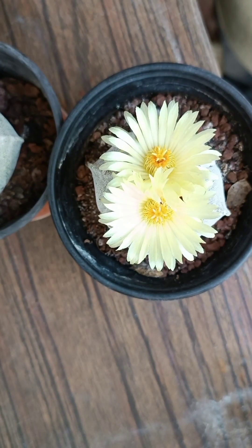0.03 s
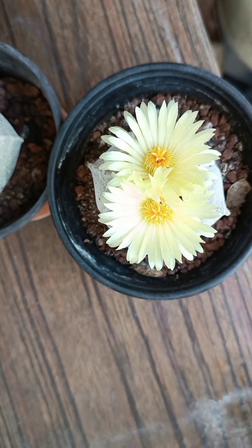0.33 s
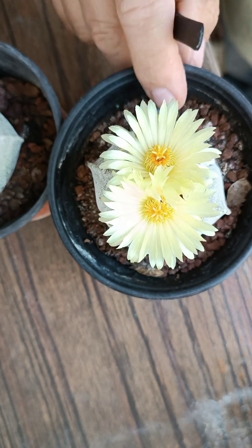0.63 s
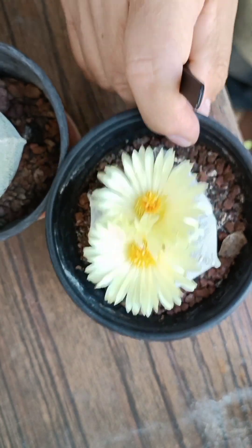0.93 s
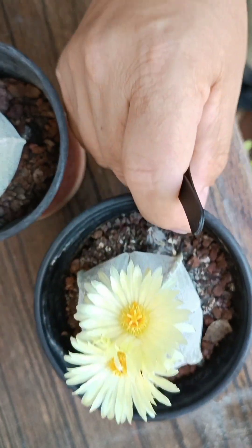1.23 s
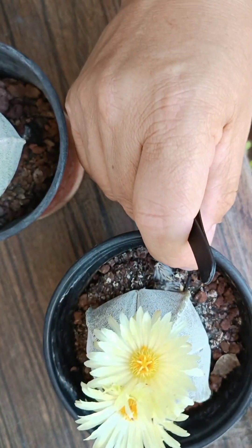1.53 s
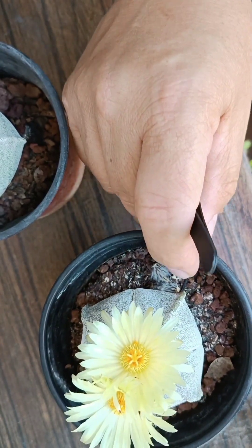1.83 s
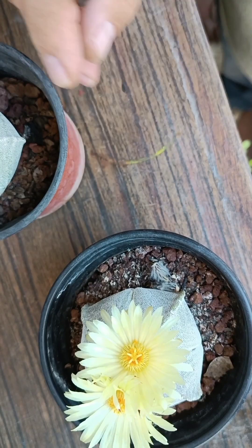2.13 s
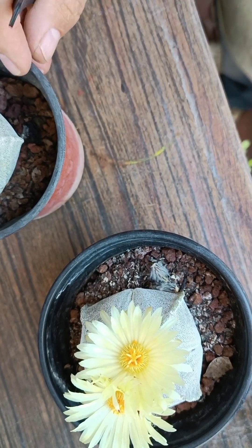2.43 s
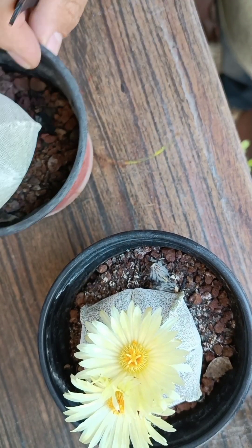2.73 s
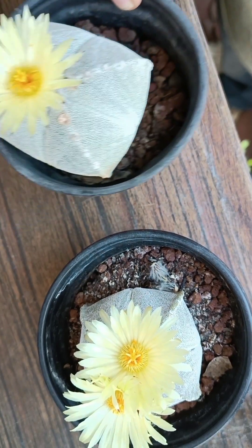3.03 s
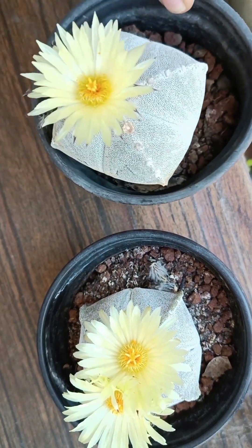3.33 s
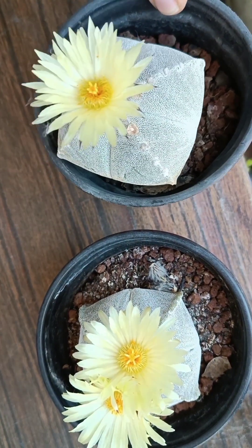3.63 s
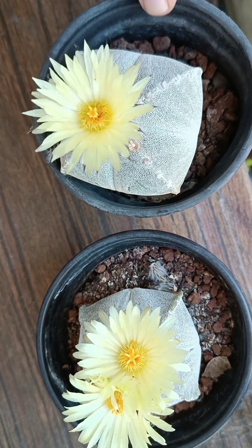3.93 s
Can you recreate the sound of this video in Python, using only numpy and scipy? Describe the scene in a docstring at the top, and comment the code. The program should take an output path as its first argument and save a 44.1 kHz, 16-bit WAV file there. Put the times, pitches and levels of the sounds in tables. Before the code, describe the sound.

Two gravel-filled plastic pots are dragged one after the other over a wooden table, close by. The first scrapes and bumps, the second judders with a grittier rasp. Outdoors, a distant engine drones and birds chirp faintly.

```python
"""Plant pots dragged over a table

Two gravel-filled plastic pots are dragged in turn over a wooden table outdoors. Their bases stick
and slip: the table booms, the thin walls rasp, grit crackles and the pots tick as they catch.
Fingers rub and tap the rims. Behind it a distant engine drones and a few birds chirp faintly."""
import sys
import numpy as np
from scipy import signal
from scipy.fft import rfft, irfft
from scipy.io import wavfile
from scipy.ndimage import uniform_filter1d

SR = 44100
rng = np.random.default_rng(int(sys.argv[2]) if len(sys.argv) > 2 else 0)


def generate_wav(signal):
    """Clip the signal to [-1, 1] and save it as 16-bit WAV at the path in sys.argv[1]."""
    frames = np.transpose(np.atleast_2d(signal))
    scaled = np.clip(frames, -1, 1) * 32767
    pcm = np.round(scaled).astype(np.int16)
    wavfile.write(sys.argv[1], SR, pcm)


N = 176400
TIME = np.arange(N) / SR
CRUNCH_T60_S = 0.014

# spectra of crackling grit and of a knocked pot wall (frequency [Hz], density [dB])
GRIT_SPECTRUM = [(1500, -24), (3000, -3.5), (5000, 0), (7000, -1), (9000, -8.5), (11500, 0), (13000, -4),
                 (15000, 3.5), (17000, -4.5)]
KNOCK_SPECTRUM = [(350, -23), (550, 10), (950, 3.5), (1600, -0.5), (2700, 2), (3500, -9.5), (5000, -15.5),
                  (8000, -28.5), (16000, -54)]
# modes of the table under each pot (frequency [Hz], width [Hz], level [dB])
FIRST_TABLE_MODES = [(225.3, 24, 4), (288, 18, 4.5), (332, 110, -7), (406, 30, -2), (417, 32, 0),
                     (490, 45, -6.5), (570, 33, -7)]
SECOND_TABLE_MODES = [(217.5, 12, 2.5), (245, 34, 3), (389.3, 7.2, -3.5), (423.7, 11, -1.5),
                      (478.5, 14, -10), (563, 36, -9.5)]
# modes of each pot's wall (frequency [Hz], width [Hz], level [dB])
FIRST_POT_MODES = [(706, 43, -3), (915, 160, 5.5), (1059, 45, 6.5), (1297, 70, 1), (1510, 25, -4.5),
                   (1805, 78, 0), (2260, 90, -3.5), (2590, 130, -2), (2990, 80, -7)]
SECOND_POT_MODES = [(745, 79, 3.5), (820, 16, 1), (868, 8.7, 0.5), (954, 14, 5), (1118, 63, 3),
                    (1195, 45, -2), (1374, 35, 3), (1830, 27, -1), (2040, 22, 3), (2400, 73, 4.5),
                    (3890, 320, -6)]


def from_db(db):
    return 10 ** (np.asarray(db) / 20)


def unit_rms(x):
    return x / np.sqrt(np.mean(x ** 2) + 1e-20)


def curve(rows, column=1, outside=None):
    rows = np.array(rows)
    return np.interp(TIME, rows[:, 0], rows[:, column], outside, outside)


def at_hz(rows, hz):
    rows = np.array(rows)
    return np.interp(np.log(hz + 1), np.log(rows[:, 0]), rows[:, 1])


def pan(left_over_right_db):
    return unit_rms(from_db([[left_over_right_db / 2], [-left_over_right_db / 2]]))


def add(out, start_s, sound):
    start = max(int(start_s * SR), 0)
    out[:, start:start + sound.shape[1]] += sound[:, :N - start]


def convolve(x, response):
    return signal.fftconvolve(np.atleast_2d(x), response, axes=1)[:, :N]


def steady(x, window=1300):
    """Level held at rms 1 over `window` samples; finer grain stays."""
    return x / np.sqrt(np.abs(uniform_filter1d(np.mean(x ** 2, axis=0), window)) + 1e-9)


def drift(cutoff_hz):
    """Low-passed random wander, rms 1."""
    lowpass = signal.butter(2, cutoff_hz, fs=SR, output="sos")
    return unit_rms(signal.sosfilt(lowpass, rng.standard_normal(N + SR))[SR:])


def noise(spectrum, size=N):
    """Coloured stereo noise, narrow in the bass, wide in the treble; rms 1."""
    # stereo likeness (frequency [Hz], left-right correlation [-])
    correlation = [(60, 1), (150, 0.83), (260, 0.93), (500, 0.35), (1000, 0.097), (2500, 0.17),
                   (15000, -0.027)]
    hz = np.arange(size // 2 + 1) * SR / size
    mid, side = rfft(rng.standard_normal((2, size)))
    alike = np.clip(at_hz(correlation, hz), -1, 1)
    stereo = np.sqrt(1 + alike) * mid + np.sqrt(1 - alike) * side * [[1], [-1]]
    gain = from_db(at_hz(spectrum, hz)) * np.minimum(hz / spectrum[0][0], 1) ** 2
    return unit_rms(irfft(gain * stereo, size))


def contacts(per_s, spread_db):
    """Random clicks of uneven size."""
    hits = rng.random(N) < per_s / SR
    strength = from_db(spread_db * np.minimum(rng.exponential(1, N), 4))
    return hits * strength * rng.choice([-1, 1], N)


def resonate(x, hz, width_hz):
    """One resonance, rms 1."""
    radius = np.exp(-np.pi * width_hz / SR)
    feedback = [1, -2 * radius * np.cos(2 * np.pi * hz / SR), radius * radius]
    return unit_rms(signal.lfilter([1, 0, -1], feedback, x + 1e-18))


def burst(spectrum, t60_s, size=16384):
    """Decay of many close modes after one contact, energy 1."""
    decay = from_db(-60 * np.arange(size) / SR / t60_s)
    return unit_rms(noise(spectrum, size) * decay) / np.sqrt(size)


def scattered(clicks, spectrum, t60_s, spots):
    """Clicks land on random spots, each with a slightly different ring."""
    spot = rng.integers(0, spots, N)
    return sum(convolve(clicks * (spot == k), burst(spectrum, t60_s, size=4096)) for k in range(spots))


def ringing(clicks, modes):
    """Clicks drive each mode with random strength; a second filter darkens the gaps between modes."""
    return sum(from_db(db) * resonate(resonate(clicks * rng.standard_normal((2, N)), hz, width_hz),
                                      hz, 8 * width_hz) for hz, width_hz, db in modes)


def struck(modes, weights):
    """Damped modes after one blow."""
    age_s = np.arange(16384) / SR
    return sum(weight * from_db(db) * np.exp(-np.pi * width_hz * age_s) * np.sin(2 * np.pi * hz * age_s)
               for weight, (hz, width_hz, db) in zip(weights, modes))


def echo(x, t60_s):
    """Scatter from nearby walls and objects."""
    spectrum = [(200, -7.5), (3000, 9.0), (7000, 1.5), (16000, -14.5)]  # (frequency [Hz], density [dB])
    rise_s = 0.00067
    swell = 1 - np.exp(-np.arange(16384) / SR / rise_s)
    return convolve(x, swell * burst(spectrum, t60_s))


def air():
    """Steady outdoor hush."""
    # background spectrum (frequency [Hz], density [dB])
    spectrum = [(300, 1.5), (600, -1.5), (1000, -6), (1500, -9.5), (2500, -10.5), (3400, -20),
                (5000, -27.5), (7000, -34.5), (10000, -41.5), (14500, -36.5), (17000, -32.5)]
    return from_db(-50.5) * noise(spectrum)


def birds():
    """Short, distant glides blurred by echoes."""
    # calls (time [s], length [s], start [Hz], end [Hz], level [dB])
    chirps = [(.05, .055, 3700, 4350, -61), (.11, .045, 3400, 3250, -65), (.308, .035, 4450, 4050, -62),
              (.8, .06, 3560, 3500, -58), (2.0, .05, 4100, 3700, -61), (2.06, .045, 3500, 3350, -61),
              (3.94, .07, 1780, 1740, -59)]
    out = np.zeros(N)
    wobble = 1 + 0.022 * drift(120)
    for start_s, length_s, start_hz, end_hz, db in chirps:
        progress = np.clip((TIME - start_s) / length_s, 0, 1)
        hz = (start_hz + (end_hz - start_hz) * progress) * wobble
        out += from_db(db) * np.sin(np.pi * progress) * np.sin(2 * np.pi * np.cumsum(hz) / SR)
    return out + from_db(-3) * echo(out, t60_s=0.4)


def engine():
    """Distant engine: fluttering drone, weak octave, low throb, rumble that swells with the drone."""
    # drone and throb envelopes (time [s], level [dB])
    drone_level = [(0, -24), (.1, -21), (.16, -23), (.185, -31), (.22, -23.5), (.27, -24), (.29, -31),
                   (.32, -23), (.42, -26), (.47, -37), (.5, -31), (.56, -39), (.69, -39), (.74, -55),
                   (.88, -39), (.97, -23), (1.04, -32), (1.12, -25), (1.19, -26), (1.22, -38), (1.26, -27),
                   (1.32, -40), (1.41, -42), (1.45, -32), (1.51, -46), (1.6, -25), (1.64, -39), (1.68, -27),
                   (1.82, -30), (1.96, -26), (1.99, -41), (2.03, -29), (2.38, -26.5), (2.5, -26),
                   (2.62, -35), (2.69, -30), (2.74, -39), (2.81, -32), (2.86, -42), (2.94, -32),
                   (3.05, -38), (3.3, -44), (4, -48)]
    throb_level = [(0, -55), (.6, -52), (.8, -43), (1.05, -50), (1.4, -45), (1.8, -47), (2.12, -40),
                   (2.5, -47), (2.85, -44), (3.3, -53), (4, -56)]
    # drone pitch (time [s], frequency [Hz])
    drone_pitch = [(0, 156.5), (.3, 159), (.95, 154), (1.15, 157), (1.7, 154), (2.15, 150), (2.45, 155.2),
                   (2.75, 150.3), (3.1, 158.5), (4, 153.8)]
    # rumble spectrum (frequency [Hz], density [dB])
    rumble_spectrum = [(25, -18), (50, -15), (85, -3.5), (112, 8), (140, 5), (185, 5), (220, -1.5),
                       (280, -6), (400, -15), (700, -52.5)]
    throb_hz, flutter_depth = 68.7, 0.44
    drone_db = curve(drone_level)
    phase = 2 * np.pi * np.cumsum(curve(drone_pitch)) / SR
    flutter = 1 + flutter_depth * resonate(rng.standard_normal(N), hz=16.4, width_hz=5.1)
    blur = 0.66 * drift(7.7) * np.cos(phase)
    drone = unit_rms(uniform_filter1d(flutter, size=400) * np.sin(phase) + blur)
    octave = from_db(-27) * unit_rms(drift(27) * np.sin(2 * phase))
    throb_phase = 2 * np.pi * throb_hz * TIME
    throb_blur = 0.59 * (drift(8.8) * np.sin(throb_phase) + drift(11.0) * np.cos(throb_phase))
    throb = unit_rms(np.sin(throb_phase) + throb_blur)
    rumble = from_db(-38 + 0.25 * (drone_db - drone_db.mean())) * noise(rumble_spectrum)
    return from_db(drone_db) * (drone + octave) + from_db(curve(throb_level)) * throb + rumble


def squeak():
    """One short, high squeak that drops onto its pitch."""
    start_s, length_s, final_hz = 0.41, 0.022, 5750
    progress = np.clip((TIME - start_s) / length_s, 0, 1)
    phase = 2 * np.pi * np.cumsum(final_hz * (1 + 0.09 * (1 - progress) ** 4)) / SR
    return from_db(-49.5) * pan(-13) * np.sin(np.pi * progress) * np.sin(phase)


def finger_rubs():
    """Skin sticks and slips on plastic; a firmer rub rings the rim more."""
    # rubs (time [s], length [s], level [dB], left-right [dB], pot [0 or 1])
    rubs = [(0.235, 0.059, -66, -8, 0), (0.392, 0.046, -57, -16, 0), (0.615, 0.14, -54, -1.5, 0),
            (0.752, 0.15, -54, -2.5, 0), (1.873, 0.073, -59, -1, 1), (2.299, 0.088, -52.5, -2, 1),
            (2.464, 0.063, -45, -3, 1), (2.522, 0.12, -49.5, -4.5, 1), (2.67, 0.18, -61.5, -2, 1),
            (3.686, 0.1, -63, -2, 1), (3.819, 0.2, -60, -2, 1)]
    # skin friction spectrum (frequency [Hz], density [dB])
    hiss_spectrum = [(1000, -5.5), (2400, 2.5), (3900, -11), (4700, -5.5), (5500, -17.5), (7000, -5),
                     (9000, -16), (12000, -12), (16000, -22)]
    # modes of each rim (frequency [Hz], width [Hz], level [dB])
    first_rim_modes = [(3580, 300, -6), (4200, 420, -4.5), (4930, 330, -5), (6050, 450, -8.5),
                       (7450, 400, -10.5), (13200, 600, -15), (14500, 600, -14)]
    second_rim_modes = [(1820, 220, -0.5), (2370, 160, -6.5), (3340, 86, -4), (3670, 120, -9),
                        (4090, 190, -5), (5310, 110, -1.5), (5940, 340, -4), (7340, 300, -12.5),
                        (8900, 160, -16.5), (10440, 400, -16.5), (12400, 300, -16.5)]
    fade_s, firm_db = 0.025, -50
    slips = contacts(per_s=600, spread_db=2.5)
    hiss = noise(hiss_spectrum)
    roughness = from_db(drift(90))
    rims = [ringing(slips, modes) for modes in (first_rim_modes, second_rim_modes)]
    out = np.zeros((2, N))
    for start_s, length_s, db, pan_db, pot in rubs:
        ring = from_db(0.4 * (db - firm_db)) * rims[pot]
        envelope = np.clip(np.minimum(TIME - start_s, start_s + length_s - TIME) / fade_s, 0, 1)
        out += from_db(db) * pan(pan_db) * envelope * unit_rms(roughness * (hiss + ring))
    return out


def finger_taps():
    """Light, bright clicks as fingers take hold of the second rim."""
    # taps (time [s], energy [dB], left-right [dB])
    taps = [(2.6523, -23, -6), (2.671, -21, -4), (2.682, -21, -6)]
    # tapped rim spectrum (frequency [Hz], density [dB])
    spectrum = [(2000, -6), (3900, -4), (4700, -4), (5600, 2), (7000, -1), (8500, -24), (12000, -18),
                (16000, -22)]
    out = np.zeros((2, N))
    for start_s, db, pan_db in taps:
        add(out, start_s, from_db(db) * pan(pan_db) * burst(spectrum, t60_s=0.013))
    return out


def pot_ticks():
    """A pot catches, rocks or creaks: sharp snap, bright crack, longer ring of the wall."""
    # catches (time [s], gain [dB], extra ring gain [dB], left-right of snap and crack [dB])
    catches = [(0.897, -39.5, 5, 0), (0.9235, -35.5, 6, 8), (1.0065, -46.5, 5, -4),
               (1.0677, -36.5, 1.5, 11), (1.1478, -46, -4, 14), (1.2378, -50, 7, 7),
               (1.3051, -34.5, 1.5, 10), (1.357, -45, -16, 9), (1.407, -47, -13, 4), (1.5124, -41, 3.5, -2),
               (1.6239, -51, 5.5, 8), (1.7944, -40, -28, 4), (1.813, -45, -7, 4), (1.8612, -53, -7, 1.5),
               (1.997, -51.5, -22, -3.5), (2.6813, -45, -30, 7), (2.742, -39.5, -15, -4),
               (2.8052, -40, 0.5, 1.0), (2.8747, -35, -2.5, -4), (2.9636, -32, -2, -17),
               (3.1884, -46, -20, -3), (3.234, -46, 7, -4), (3.2745, -31, -11, -1), (3.321, -27, -2, -4),
               (3.6143, -42, 4, -4), (3.6408, -45, -23, -4), (3.8253, -44, -30, 0)]
    out = np.zeros((2, N))
    for start_s, db, ring_db, pan_db in catches:
        snap = from_db(16) * burst(GRIT_SPECTRUM, t60_s=0.006)
        crack = from_db(13) * burst(GRIT_SPECTRUM, t60_s=0.045)
        ring = from_db(ring_db + 22) * burst(KNOCK_SPECTRUM, t60_s=0.11)
        add(out, start_s, from_db(db) * (pan(pan_db) * (snap + crack) + ring))
    return out


def pot_bumps():
    """A base drops back on the table and rings both table and pot."""
    # drops (time [s], gain [dB], extra clack gain [dB], pot [0 or 1])
    drops = [(1.1028, -17.5, 11.5, 0), (1.1215, -24, 7, 0), (1.1685, -33, 13, 0), (3.0988, -28, 18, 1)]
    bodies = [(FIRST_TABLE_MODES, FIRST_POT_MODES), (SECOND_TABLE_MODES, SECOND_POT_MODES)]
    out = np.zeros((2, N))
    for start_s, db, clack_db, pot in drops:
        table_modes, pot_modes = bodies[pot]
        table = from_db(-14) * struck(table_modes, np.ones(len(table_modes)))
        wall = from_db(-18) * struck(pot_modes, rng.standard_normal((len(pot_modes), 2, 1)))
        clack = from_db(clack_db) * burst(KNOCK_SPECTRUM, t60_s=0.06)
        add(out, start_s, from_db(db) * (table + wall + clack))
    return out


def pot_judder():
    """Near-periodic stick-slip of the second base: a hollow groan whose overtones ring the wall."""
    # judder (time [s], slip rate [1/s], level [dB])
    judder = [(3.03, 212, -53), (3.065, 221, -24), (3.11, 218, -30.5), (3.143, 218.6, -30),
              (3.18, 207, -36), (3.21, 270, -67)]
    cycles = np.cumsum(curve(judder) * (1 + 0.012 * drift(74))) / SR
    slips = np.diff(np.floor(cycles), prepend=0)
    groan = unit_rms(np.sin(2 * np.pi * cycles))
    wall = unit_rms(sum(from_db(db) * rng.choice([-1, 1], (2, 1)) * resonate(slips, hz, 2 * width_hz)
                        for hz, width_hz, db in SECOND_POT_MODES))
    uneven_slips = slips * rng.standard_normal(N)
    crunch = unit_rms(convolve(uneven_slips, burst(KNOCK_SPECTRUM, CRUNCH_T60_S, size=4096)))
    level = from_db(curve(judder, column=2, outside=-120))
    return level * (groan + from_db(-14) * wall + from_db(-25.5) * crunch)


def table_boom(slips, modes):
    """Slips drive the table's modes; higher modes spread wider in stereo."""
    # weight of the modes below deep_hz (time [s], gain [dB])
    deep_weight = [(0.9, 0), (1.12, -5), (1.4, 0), (2.98, -4.5), (3.04, -2), (3.09, -5.5), (3.18, 8.5),
                   (3.28, -10)]
    deep_hz = 350
    deep_gain = from_db(curve(deep_weight))
    out = np.zeros((2, N))
    for hz, width_hz, db in modes:
        mid, side = (resonate(resonate(slips * rng.standard_normal(N), hz, width_hz), hz, 4 * width_hz)
                     for _ in range(2))
        spread = 0.17 * (hz / deep_hz) ** 2
        gain = from_db(db) * (deep_gain if hz < deep_hz else 1)
        out += gain * steady(mid + spread * side * [[1], [-1]], window=4000)
    return steady(out)


def drag(strokes, table_modes, pot_modes):
    """A slipping base shakes table and pot wall and crushes grit; returns (boom, scrape)."""
    # dense ring of a filled pot (frequency [Hz], density [dB])
    wall_spectrum = [(350, -34), (550, 0), (900, -0.5), (1500, -0.5), (2500, -2.5), (3400, -5), (5000, -15),
                     (8000, -24), (16000, -58)]
    boom_gain, rasp_gain, grit_gain = (
        sum(from_db(curve(stroke, column, outside=-120)) for stroke in strokes) for column in (1, 2, 3))
    slips = contacts(per_s=450, spread_db=2)
    boom = from_db(-0.5) * boom_gain * table_boom(slips, table_modes)
    wall = from_db(1) * steady(scattered(slips, wall_spectrum, t60_s=0.13, spots=2))
    wall += from_db(4) * steady(ringing(slips, pot_modes))
    crushes = contacts(per_s=220, spread_db=2.5)
    crunch = from_db(-1) * steady(scattered(crushes, KNOCK_SPECTRUM, CRUNCH_T60_S, spots=2), window=3000)
    grains = contacts(per_s=360, spread_db=6)
    crackle = from_db(11) * steady(scattered(slips + grains, GRIT_SPECTRUM, t60_s=0.015, spots=3))
    scrape = rasp_gain * (wall + crunch) * pan(-1.5) + grit_gain * crackle * pan(4)
    return np.array([boom, scrape])


def first_drag():
    """The first pot is pulled along, then eases off."""
    # strokes (time [s], boom gain [dB], rasp gain [dB], grit gain [dB])
    pull = [(0.84, -43.5, -64, -88), (0.934, -32.5, -51, -59), (0.976, -36.5, -53.5, -79),
            (1.012, -31.5, -52, -64.5), (1.05, -36.5, -54.5, -77), (1.066, -38, -48, -60),
            (1.08, -34.5, -42.5, -58), (1.1, -30, -45, -70), (1.116, -29.5, -40.5, -65),
            (1.132, -32.5, -56.5, -95), (1.17, -34.5, -42, -60), (1.204, -35, -54, -92),
            (1.236, -40, -51, -62.5), (1.282, -42, -71, -105), (1.295, -56, -78, -92)]
    easing = [(1.302, -44, -64, -81), (1.314, -34.5, -60, -96), (1.42, -39, -57.5, -77.5),
              (1.62, -45, -71, -96)]
    return drag([pull, easing], FIRST_TABLE_MODES, FIRST_POT_MODES)


def second_drag():
    """The second pot moves in one jerky, grittier pull."""
    # stroke (time [s], boom gain [dB], rasp gain [dB], grit gain [dB])
    pull = [(2.85, -79, -75, -88), (2.88, -46, -46, -58.5), (2.898, -33, -44, -63), (2.946, -55, -73, -92),
            (2.964, -25, -44.5, -41), (2.976, -26, -34.5, -49.5), (3.026, -29.5, -36.5, -49),
            (3.084, -31.5, -54.5, -76), (3.1, -25, -42, -61), (3.196, -31.5, -47, -58.5),
            (3.224, -47, -60, -72), (3.256, -35.5, -39.5, -50), (3.312, -40, -52, -68),
            (3.324, -44.5, -47, -51.5), (3.378, -47, -52.5, -71.5), (3.396, -69, -58.5, -73),
            (3.456, -41, -50.5, -72), (3.5, -55, -86, -112)]
    return drag([pull], SECOND_TABLE_MODES, SECOND_POT_MODES)


def scene():
    """Drags and handling, with a short echo, over the outdoor background."""
    boom, scrape = first_drag() + second_drag()
    handling = pot_ticks() + pot_bumps() + finger_rubs() + finger_taps() + squeak()
    outdoors = engine() + birds() + air()
    pots = boom + scrape + pot_judder() + handling
    reflections = from_db(-5) * echo(handling + from_db(-5.5) * scrape, t60_s=0.091)
    return outdoors + pots + reflections


def record(dry):
    """Click-free fade-in and a steep treble cut."""
    fade_s, cutoff_hz = 0.008, 16000
    lowpass = signal.ellip(10, 0.2, 80, cutoff_hz, fs=SR, output="sos")
    return signal.sosfilt(lowpass, dry * np.minimum(TIME / fade_s, 1))


dry = scene()
out = record(dry)
generate_wav(out)
```